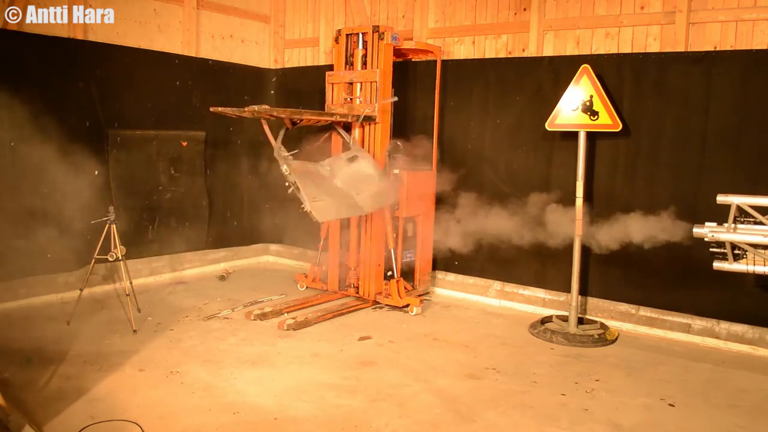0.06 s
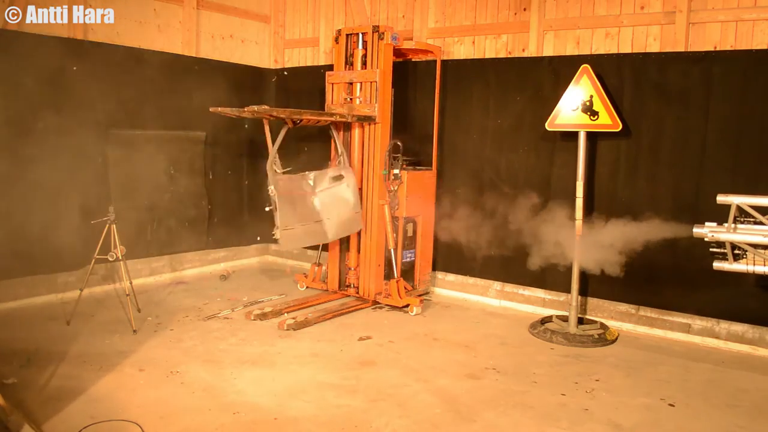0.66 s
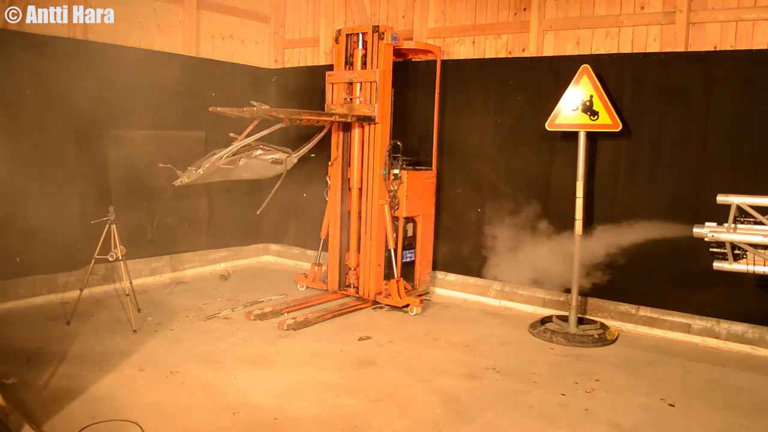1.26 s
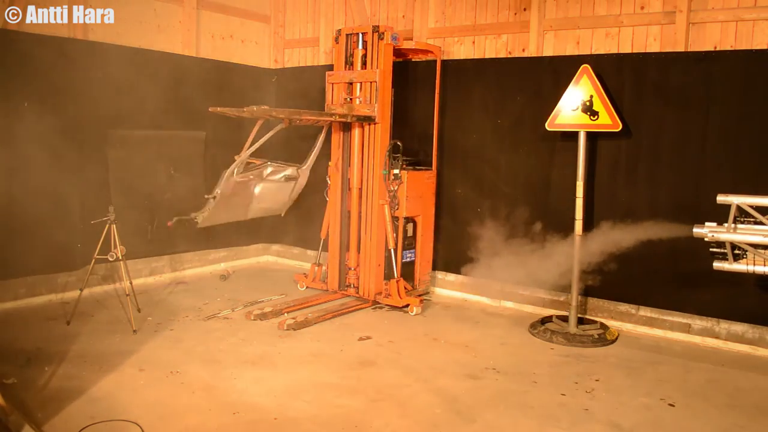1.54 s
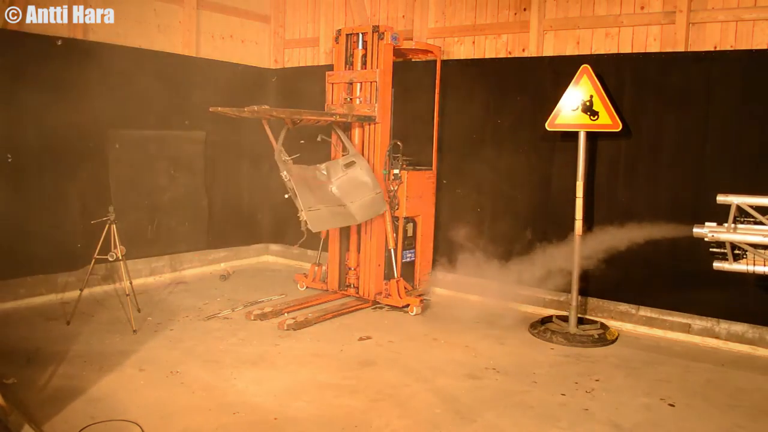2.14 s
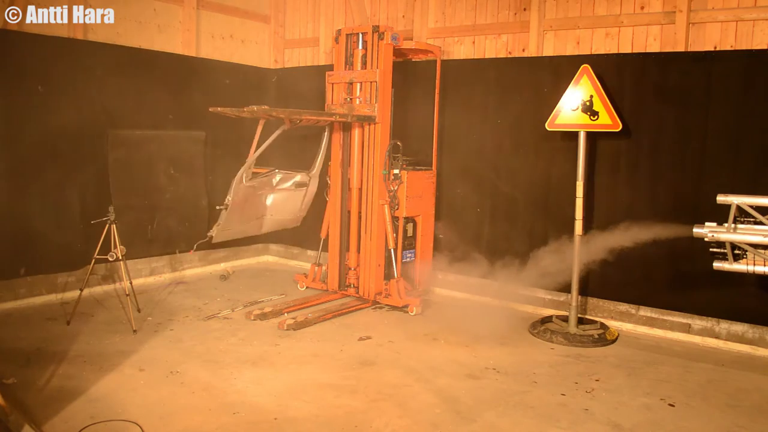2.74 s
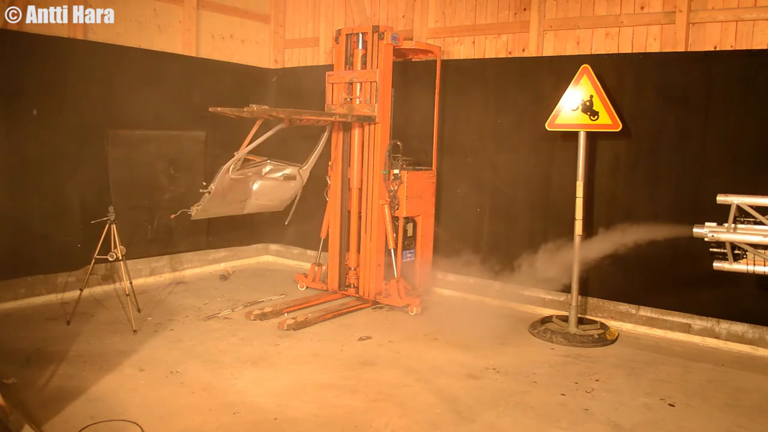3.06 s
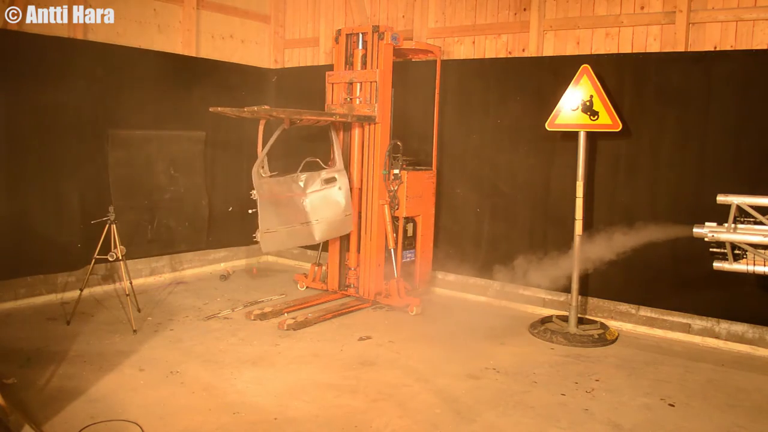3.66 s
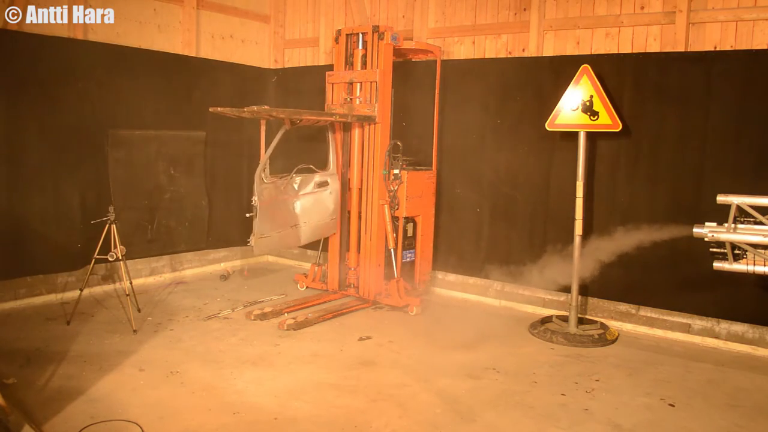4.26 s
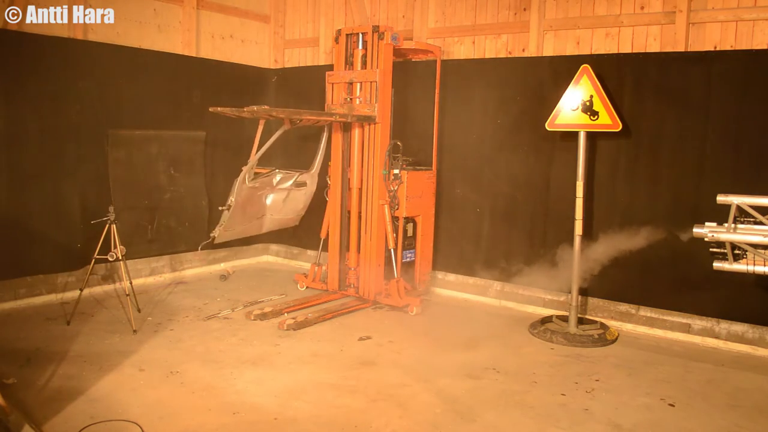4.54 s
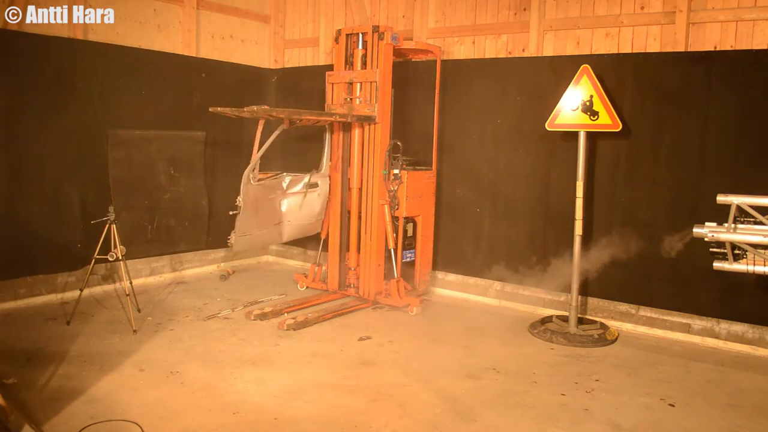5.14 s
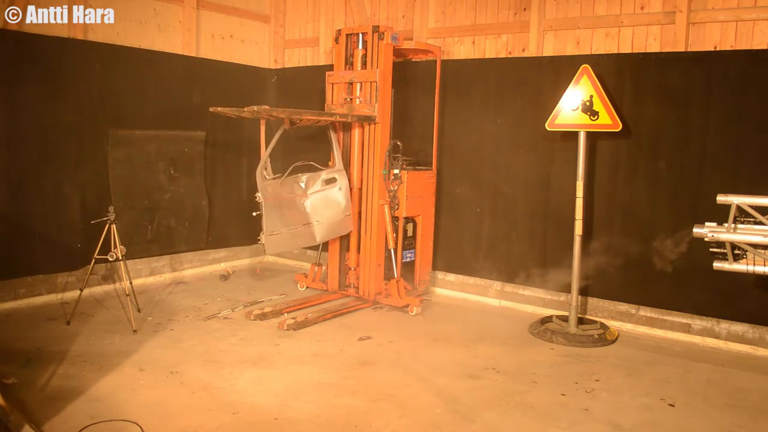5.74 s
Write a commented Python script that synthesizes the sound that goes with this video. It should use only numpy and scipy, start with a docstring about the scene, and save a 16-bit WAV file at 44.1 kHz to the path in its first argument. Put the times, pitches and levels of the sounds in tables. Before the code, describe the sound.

The sound opens on the noisy echo of an air cannon shot in a large hall, without the shot itself, fading over about two seconds. Glass shards and grit tick on concrete to both sides, dense in the first second, then sparser and softer. Left of centre, a hanging car door knocks several times in the first 0.3 seconds, then gives softer, irregular knocks, low sheet metal booms and ringing clanks from about 1.5 to 3.5 seconds. A wide, bright hiss of escaping air runs steadily underneath. At about 4.3 seconds the valve slams shut with a short, crackling blast of air, by far the loudest event. The steel barrel rings brightly for about half a second and the hiss stops. Soft, low bumps come close to the microphones at 5.1 and 5.7 seconds, with faint door knocks, over quiet room tone and a slight electrical hum.

```python
"""Air cannon aftermath in a large hall

A stereo pair of microphones hears the shot's echo die while glass and grit rain on the concrete.
Left of centre, the car door that was hit swings and knocks on its hanger. Air hisses from the cannon
until its valve slams shut with a short blast that sets the steel barrel ringing.
A few soft bumps follow close to the microphones, over an electrical hum."""
import sys
import numpy as np
from scipy import signal
from scipy.io import wavfile
from scipy.ndimage import uniform_filter1d

SR = 44100
rng = np.random.default_rng(int(sys.argv[2]) if len(sys.argv) > 2 else 0)


def unload_wav(signal):
    """Save mono or channel-first audio to the path in sys.argv[1] as 16-bit WAV at rate SR, clipped to [-1, 1]."""
    wavfile.write(
        sys.argv[1],
        SR,
        np.round(np.clip(np.atleast_2d(signal).T, -1, 1) * 32767).astype(np.int16),
    )


N = 259749
TIME = np.arange(N) / SR


def from_db(db):
    return 10 ** (np.asarray(db) / 20)


def unit_rms(x):
    return x / np.sqrt(np.mean(x ** 2) + 1e-20)


def at_hz(curve, hz):
    """Reads a curve on a log-frequency axis."""
    frequencies, values = np.transpose(curve)
    return np.interp(np.log(hz), np.log(frequencies), values)


def band_pass(x, low_hz, high_hz):
    edges = [min(low_hz, .4 * SR), min(max(high_hz, 1.1 * low_hz), .47 * SR)]
    return signal.sosfilt(signal.butter(2, edges, "band", fs=SR, output="sos"), x + 1e-18)


# Balance of the microphone pair: (frequency [Hz], left minus right [dB])
MIC_BALANCE = [(100, 0), (500, 0.24), (1200, 2.5), (4000, -0.95), (8000, -1), (15000, -4)]
def mic_gains(hz):
    """Left and right gain at one frequency."""
    return from_db(at_hz(MIC_BALANCE, hz) * np.array([[.5], [-.5]]))


# Diffuse sound at the pair: (frequency [Hz], left-right correlation [-1..1])
MIC_CORRELATION = [(60, .93), (130, 1), (270, 0.39), (450, 0.34), (1200, -0.049), (3000, 0.16),
                   (16000, -0.057)]
def diffuse_bands(size):
    """Noise arriving from all sides, in third octaves: (centre, share of the spectrum, stereo band)."""
    edges = 25 * 2 ** (np.arange(30) / 3)
    white = rng.standard_normal((2, 2, size + SR // 10))
    for k, (low, high) in enumerate(zip(edges, edges[1:])):
        mid, side = band_pass(white[k % 2], low, high)[:, -size:]
        hz = np.sqrt(low * high)
        alike = at_hz(MIC_CORRELATION, hz)
        pair = np.sqrt(1 + alike) * mid + np.sqrt(1 - alike) * side * [[1], [-1]]
        yield hz, (high - low) / (SR / 2), pair * mic_gains(hz)


def coloured(bands, spectrum):
    return unit_rms(sum(from_db(at_hz(spectrum, hz)) * band for hz, _, band in bands))


# Reverberation of the hall: (frequency [Hz], t60 [s])
HALL_T60 = [(60, 0.86), (120, 0.95), (250, 0.68), (500, 0.66), (1000, 0.59), (3000, 0.68), (5400, 0.56),
            (7700, 0.37), (11000, 0.34), (16000, 0.16)]
def hall_response(build_s=.003):
    """Reflections thicken over the first milliseconds, then die, the treble first."""
    t, response = TIME[:SR], 0
    for hz, share, band in diffuse_bands(size=SR):
        tail = band * (1 - np.exp(-t / build_s)) * from_db(-60 * t / at_hz(HALL_T60, hz))
        response += unit_rms(tail) * np.sqrt(share / SR)
    return response


def in_hall(sources, hall):
    """Each source reverberates from a place of its own."""
    return sum(signal.oaconvolve(x[None, :N], response, axes=1)[:, :N]
               for x, response in zip(sources, hall))


# Still air all around the microphones: (frequency [Hz], relative density [dB])
STILL_AIR = [(25, -5), (60, -8.5), (110, 7), (200, -5), (400, -5.5), (800, -14.5), (2000, -16.5),
             (5000, -21.5), (9000, -23.5), (12000, -29), (16000, -35.5)]
# Electrical hum, dead centre: (frequency [Hz], rms level [dB])
HUM_TONES = [(100, -72.5), (300.5, -76.5)]
def room_tone(bands, level_db=-66):
    """The quiet hall: still air and a steady electrical hum."""
    air = from_db(level_db) * np.roll(coloured(bands, STILL_AIR), 2 * SR, axis=1)
    hum = sum(np.sqrt(2) * from_db(db) * np.sin(2 * np.pi * hz * TIME) for hz, db in HUM_TONES)
    return air + hum


# The cannon's hiss, spread wide across the pair: (frequency [Hz], relative density [dB])
LEAK_SPECTRUM = [(300, -26), (1000, -6.5), (2000, -9), (3300, -2), (4200, -1), (5200, 0.5), (9000, 1),
                 (11000, -0.5), (12500, 1), (16000, -1.5)]
# Its course at the microphones: (time [s], level [dB])
LEAK_LEVEL = [(0, -47), (1.4, -52), (2.7, -52.5), (4.25, -52), (4.5, -85), (4.8, -110)]
def leak(bands):
    """Air escapes from the cannon until the valve shuts."""
    level_db = np.interp(TIME, *np.transpose(LEAK_LEVEL))
    return from_db(level_db) * np.roll(coloured(bands, LEAK_SPECTRUM), SR, axis=1)


# The shot coming back from all over the hall: (frequency [Hz], relative density [dB])
ECHO_SPECTRUM = [(40, -52), (90, 2.5), (250, 0.5), (600, -0.5), (1300, -3.5), (3200, 0.5), (6000, -5),
                 (10000, -6.5), (16000, -32)]
def shot_echo(bands, start_db=-34.5, t60_s=3.6):
    """The shot's reflections have merged into noise that dies away."""
    return from_db(start_db - 60 * TIME / t60_s) * coloured(bands, ECHO_SPECTRUM)


# Bumps close to the microphones: (time [s], peak level [dB], pitch [Hz], t60 [s])
CLOSE_BUMPS = [(5.123, -42, 171, .05), (5.148, -50.5, 100, 0.1), (5.675, -45.5, 228.5, 0.083),
               (5.684, -51, 110, .06)]
def bumps(click_top_hz=479):
    """A soft click and a few dying bass cycles, dry and alike on both sides."""
    clicks, thuds = np.zeros((2, N))
    age = TIME[:SR // 8]
    for s, peak_db, hz, t60 in CLOSE_BUMPS:
        start = round(s * SR)
        thud = from_db(peak_db - 60 * age / t60) * np.sin(2 * np.pi * hz * age)
        thuds[start:start + len(age)] += thud
        clicks[start] = from_db(peak_db + 32)
    return thuds + band_pass(clicks, click_top_hz / 2, click_top_hz)


# Grit on the concrete to both sides: (octave centre [Hz], gain [dB])
GRIT_OCTAVES = [(350, -1), (700, -1), (1400, 3), (2800, -0.5), (5600, -0.5), (11200, -7)]
def grit(hall, thinning_s=.73, size_spread_db=5, colour_spread_db=6, direct_db=-1):
    """Glass crumbs land ever more sparsely and softly, each a tick of its own size, colour and side."""
    per_s = 40 + 1300 * np.exp(-TIME / thinning_s)
    level_db = np.maximum(-42.5 - 9 * TIME, -82.5)
    landings = np.flatnonzero(rng.random(N) < per_s / SR)
    sizes = unit_rms(from_db(size_spread_db * np.minimum(rng.exponential(1, len(landings)), 3)))
    sizes *= rng.choice([-1, 1], len(landings))
    sizes *= np.sqrt(SR / per_s[landings]) * from_db(level_db[landings])
    ticks = 0
    for hz, gain_db in GRIT_OCTAVES:
        colour = unit_rms(from_db(colour_spread_db * rng.standard_normal((2, len(landings)))))
        clicks = np.zeros((2, N))
        clicks[:, landings] = sizes * colour
        ticks += from_db(gain_db) * band_pass(clicks, hz / np.sqrt(2), hz * np.sqrt(2))
    return from_db(direct_db) * ticks + in_hall(ticks, hall) / np.sqrt(2)


def rattle(hz, fade_s, octaves, uneven_db):
    """A run of uneven contacts that builds up quickly and fades, heard in a band around hz."""
    t = TIME[:SR // 3]
    push, size = rng.standard_normal((2, len(t)))
    swell = (1 - np.exp(-t / (.2 * fade_s))) * np.exp(-t / fade_s)
    edge = 2 ** (octaves / 2)
    return band_pass(push * from_db(uneven_db * size) * swell, hz / edge, hz * edge)


def resonate(contacts, modes):
    """Adds the ringing of a body to the contacts that strike it."""
    ring = 0
    for hz, width_hz, gain_db in modes:
        radius = np.exp(-np.pi * width_hz / SR)
        poles = [1, -2 * radius * np.cos(2 * np.pi * hz / SR), radius ** 2]
        ring += from_db(gain_db) * (1 - radius ** 2) / 2 * signal.lfilter([1, 0, -1], poles, contacts)
    return contacts + ring


def impacts(hits, hall, lag_s=.0004):
    """Hits (time, energy, direct gain, sound) reach the left microphone first and excite the hall."""
    direct, sent = np.zeros((2, N + SR)), np.zeros((len(hall), N + SR))
    for k, (s, energy_db, direct_db, sound) in enumerate(hits):
        hit = sound * from_db(energy_db) * np.sqrt(SR / np.sum(sound ** 2))
        left = round(s * SR)
        right = left + round(lag_s * rng.uniform(.5, 1.5) * SR)
        direct[0, left:left + len(hit)] += from_db(direct_db) * hit
        direct[1, right:right + len(hit)] += from_db(direct_db) * hit
        sent[k % len(hall), left:left + len(hit)] += hit
    return direct[:, :N] + in_hall(sent, hall)


def tumble(count=10, start_s=.31, end_s=.62, start_db=-57.5, fade_db_per_s=22, direct_db=-2):
    """Small chunks thud on the floor at uneven intervals, ever more softly."""
    jitter, octave = rng.uniform(-.493, .5, (count, 2)).T
    ages = (np.arange(count) + .5 + jitter) / count * (end_s - start_s)
    thuds = [rattle(hz, fade_s=.0066, octaves=2, uneven_db=5.5) for hz in 261 * 2 ** octave]
    return [(start_s + age, start_db - fade_db_per_s * age, direct_db, thud)
            for age, thud in zip(ages, thuds)]


# Shards landing left of centre: (time [s], energy [dB], pitch [Hz], fade [s], direct gain [dB])
SHARD_LANDINGS = [(0.055, -57, 8550, .0036, -4), (.2538, -45.5, 5400, .0057, -8),
                  (0.3558, -48.5, 8340, 0.0036, -5.5), (0.4732, -58, 8300, .0008, -1.5),
                  (0.504, -53, 3000, .0065, -4), (.557, -57, 7400, 0.003, -5),
                  (.6215, -61.5, 8460, 0.00072, 0), (0.6759, -54.5, 4860, 0.0041, -5),
                  (.712, -62, 5230, 0.0038, 2), (.76, -59.5, 4080, 0.0044, -8),
                  (0.9155, -49.5, 5540, 0.0012, 1), (0.9377, -56.5, 4520, 0.0013, -8),
                  (1.099, -71.5, 7200, .003, 3), (1.3324, -57.5, 6060, 0.0019, -2),
                  (2.825, -69.5, 5000, 0.0086, -7)]
# Resonances of the glass: (frequency [Hz], width [Hz], gain [dB])
GLASS_MODES = [(2480, 350, -1), (6400, 360, -18.5), (9250, 310, -4)]
def shards():
    """Glass strikes concrete in short, bright ticks."""
    return [(s, db, direct_db, resonate(rattle(hz, fade_s, octaves=1.54, uneven_db=9.5), GLASS_MODES))
            for s, db, hz, fade_s, direct_db in SHARD_LANDINGS]


# The door and big pieces, left of centre: (time [s], energy [dB], pitch [Hz], fade [s])
DOOR_KNOCKS = [(.082, -42, 880, 0.022), (.145, -47.5, 480, 0.0076), (.19, -41, 520, 0.022),
               (.228, -41, 676, 0.017), (.597, -58, 800, 0.018), (.948, -57.5, 1100, .01),
               (1.486, -60.5, 374, 0.014), (1.674, -51, 375, 0.016), (1.852, -56.5, 310, 0.02),
               (1.992, -57.5, 425, 0.033), (2.163, -52, 390, 0.017), (2.303, -58, 520, 0.023),
               (2.86, -72, 580, .03), (3.019, -72.5, 550, 0.038), (3.441, -54, 433, 0.017),
               (3.517, -59.5, 330, 0.027), (3.92, -68.5, 228, 0.064), (5.28, -63.5, 460, 0.018),
               (5.475, -80.5, 520, 0.036), (5.665, -69, 430, 0.0096), (5.745, -77, 480, 0.021)]
# Resonances of the door: (frequency [Hz], width [Hz], gain [dB])
DOOR_MODES = [(172, 25, 2), (309, 25, 0), (450, 25, 2.5), (515.3, 18, -6.5), (745, 35, -2.5)]
def door_knocks(direct_db=-2):
    """Dull knocks ring in the swinging door."""
    return [(s, db, direct_db, resonate(rattle(hz, fade_s, octaves=2.55, uneven_db=5.5), DOOR_MODES))
            for s, db, hz, fade_s in DOOR_KNOCKS]


# The door's panel, from the same side: (time [s], energy [dB], pitch [Hz], fade [s])
PANEL_BOOMS = [(.104, -48.5, 167, .012), (.265, -49.5, 215, .03), (2.018, -61.5, 130, 0.018),
               (2.35, -55.5, 235, 0.027), (3.328, -57, 115, 0.032), (3.405, -53, 145, 0.026),
               (3.495, -59.5, 140, 0.024)]
def door_booms(direct_db=-2.5):
    """The sheet metal flexes and booms."""
    return [(s, db, direct_db, rattle(hz, fade_s, octaves=.9, uneven_db=3.5))
            for s, db, hz, fade_s in PANEL_BOOMS]


# The door's fittings, more hall than direct sound: (time [s], energy [dB], fade [s])
FITTING_CLANKS = [(1.563, -50, .009), (2.025, -61, 0.0046), (2.163, -61.5, 0.0061), (2.305, -63.5, 0.0038),
                  (3.268, -59.5, 0.012), (5.273, -77, 0.021), (5.66, -79, .02), (5.71, -77, 0.0016)]
# Resonances of the fittings: (frequency [Hz], width [Hz], gain [dB])
FITTING_MODES = [(530, 64, 23), (1210, 38, 17), (2310, 46, 0), (3360, 55, 0), (3600, 90, -3), (4420, 48, 6)]
def door_clanks(hz=2990, direct_db=-6):
    """Loose metal fittings rattle and ring."""
    return [(s, db, direct_db, resonate(rattle(hz, fade_s, octaves=2.1, uneven_db=6.5), FITTING_MODES))
            for s, db, fade_s in FITTING_CLANKS]


def hanger_squeak(at_s=2.825, energy_db=-64.5, direct_db=-6):
    """The hanger gives one short, narrow-band squeak."""
    return [(at_s, energy_db, direct_db, rattle(hz=4820, fade_s=.007, octaves=.17, uneven_db=4))]


# Inside the valve, more direct sound than hall: (time [s], energy [dB], pitch [Hz], fade [s])
PISTON_CONTACTS = [(4.146, -67.5, 806, 0.047), (4.191, -68, 157, .04), (4.252, -43, 740, 0.0057),
                   (4.253, -48.5, 350, .009), (4.587, -65, 1380, .006)]
def piston(direct_db=3.5):
    """The valve's piston slides, strikes its seat and settles."""
    return [(s, db, direct_db, rattle(hz, fade_s, octaves=.9, uneven_db=4))
            for s, db, hz, fade_s in PISTON_CONTACTS]


# The steel barrel, dry at the microphones: (frequency [Hz], level [dB], t60 before the cap [s])
BARREL_MODES = [(1117, -21.5, .55), (1156, -16, 0.59), (1194, -23, .45), (3295, -24.5, .45),
                (3420, -26, 0.62), (3515, -30, .6), (3702, -28, 0.37), (4042, -28.5, 0.33),
                (4450, -24, .45), (5249, -30.5, 0.72), (5567, -25.5, .38), (5530, -26, 0.33),
                (6164, -30, .35), (6715, -26.5, .33), (7745, -26, 0.33), (8184, -27.5, .27),
                (8698, -28.5, .28), (8899, -28.5, .3), (9718, -29.5, .28), (10053, -33, .27)]
def barrel_ring(flow, span, t60_cap_s=.62, mic_phase_rad=1.6):
    """The power of the air flow drives the barrel's modes, which ring on."""
    drive = flow[span] ** 2 / np.sum(flow ** 2)
    ring = np.zeros((2, N))
    for hz, level_db, t60 in BARREL_MODES:
        decay = from_db(-60 / (min(t60, t60_cap_s) * SR))
        swing = from_db(level_db) * signal.lfilter([1], [1, -decay], drive + 1e-18)
        phase = rng.uniform(0, 2 * np.pi) + np.array([[0], [mic_phase_rad]])
        ring[:, span] += mic_gains(hz) * swing * np.sin(2 * np.pi * hz * TIME[span] + phase)
    return ring


# The valve's gust, out in the hall: (frequency [Hz], relative density [dB])
BLAST_SPECTRUM = [(35, -36.5), (65, -21.5), (100, -6.5), (180, -15), (330, -6.5), (560, -1.5), (780, -3),
                  (1100, 4), (1550, -3), (2600, -5.5), (3400, 1.5), (5400, 0), (8200, -2.5), (11000, -8.5),
                  (16000, -20.5)]
def valve_blast(bands, hall, spit_s=4.239, gust_s=4.252, peak_s=4.28, width_s=.05, direct_db=-2.5):
    """The valve shuts: a spit of air, then a crackling gust that rings the barrel."""
    span = (TIME > spit_s) & (TIME < spit_s + 1)   # the ring is gone within a second
    swell = np.exp(-((TIME - peak_s) / width_s) ** 2)
    flow = span * np.where(TIME < gust_s, from_db(-25), swell)
    crackle_db = 1.5 * unit_rms(uniform_filter1d(rng.standard_normal(N), size=24))
    turbulence = coloured(bands, BLAST_SPECTRUM)
    turbulence = np.vstack([turbulence, turbulence[:, ::-1]])   # separate noise for each place
    gust = from_db(-12) * flow * unit_rms(from_db(crackle_db)) * turbulence
    reflections = in_hall(gust, hall) / np.sqrt(len(hall))
    return from_db(direct_db) * gust[:2] + reflections + barrel_ring(flow, span)


def scene():
    bands = list(diffuse_bands(size=N))
    hall = [hall_response() for place in range(3)]
    air = room_tone(bands) + leak(bands) + shot_echo(bands)
    blast = valve_blast(bands, hall)
    door = door_knocks() + door_booms() + door_clanks() + hanger_squeak()
    hits = impacts(door + shards() + piston() + tumble(), hall)
    return air + bumps() + grit(hall) + hits + blast


def record(dry, low_hz=48, top_hz=15900):
    """The microphones lose the deep bass, peaks stop at full scale, the top is cut."""
    low_cut = signal.butter(2, low_hz, "high", fs=SR, output="sos")
    top_cut = signal.ellip(10, .1, 80, top_hz, fs=SR, output="sos")
    return signal.sosfilt(top_cut, np.clip(signal.sosfilt(low_cut, dry), -1, 1))


dry = scene()
out = record(dry)
unload_wav(out)
```